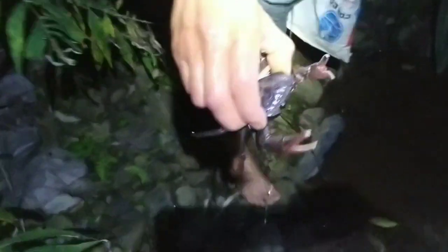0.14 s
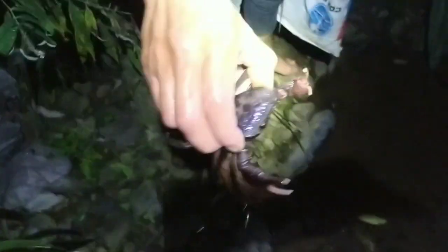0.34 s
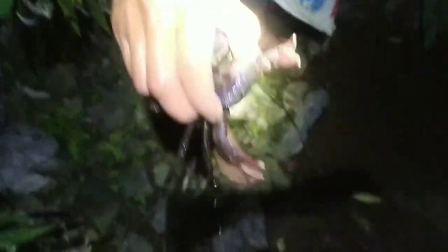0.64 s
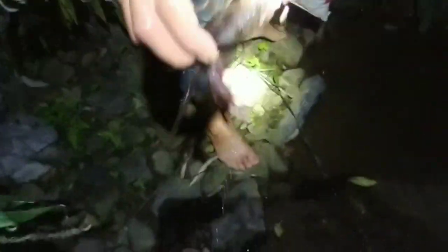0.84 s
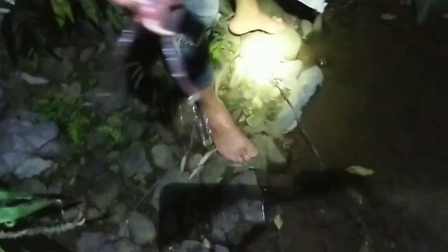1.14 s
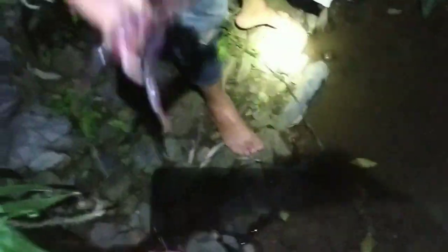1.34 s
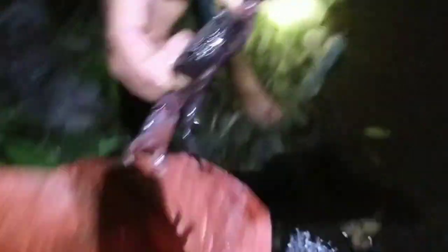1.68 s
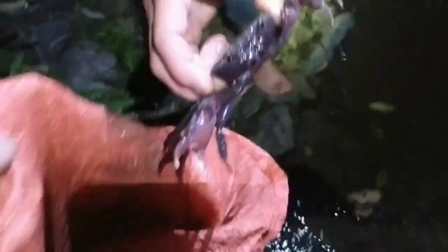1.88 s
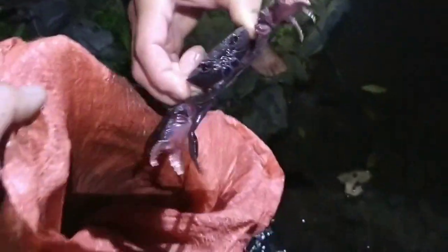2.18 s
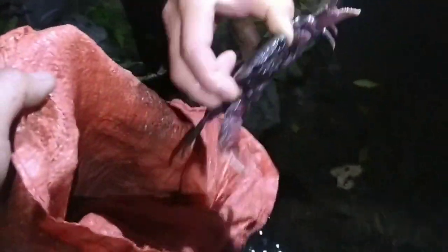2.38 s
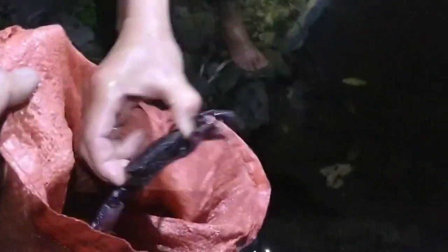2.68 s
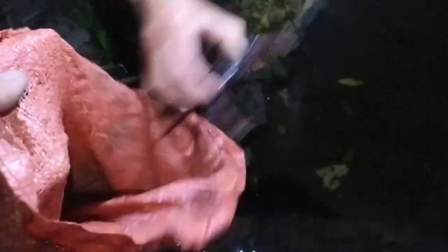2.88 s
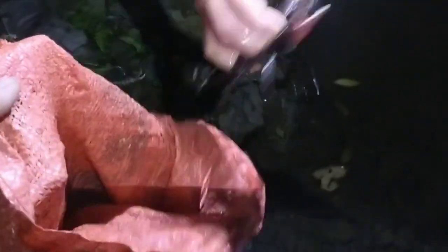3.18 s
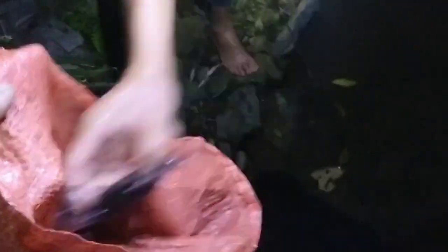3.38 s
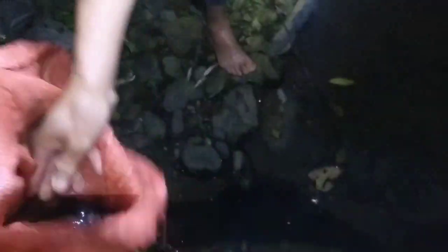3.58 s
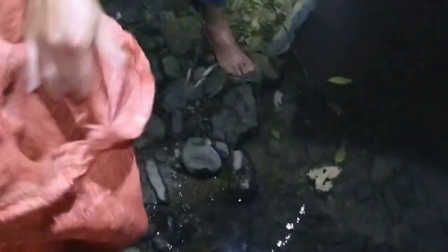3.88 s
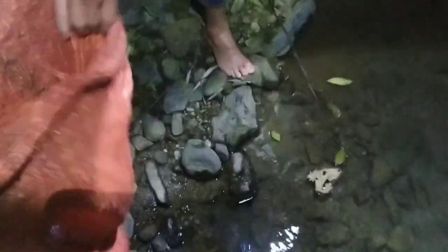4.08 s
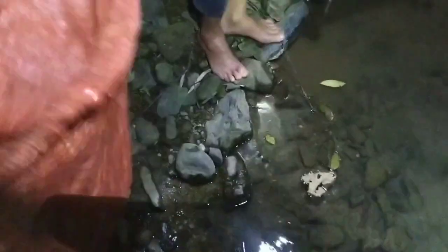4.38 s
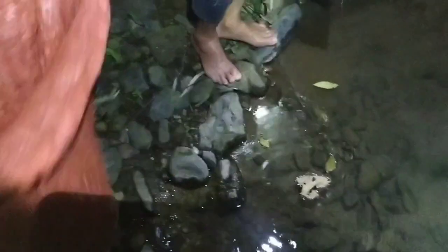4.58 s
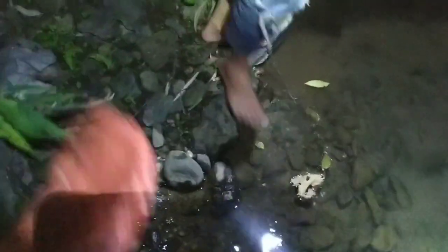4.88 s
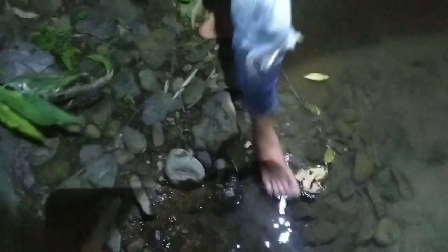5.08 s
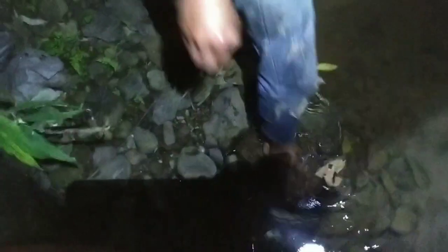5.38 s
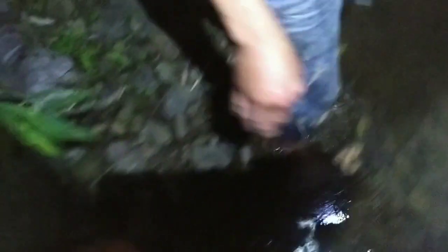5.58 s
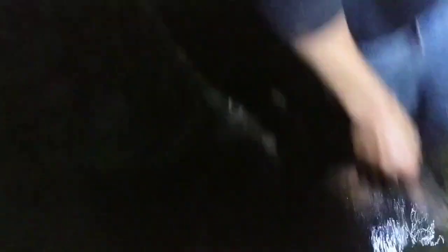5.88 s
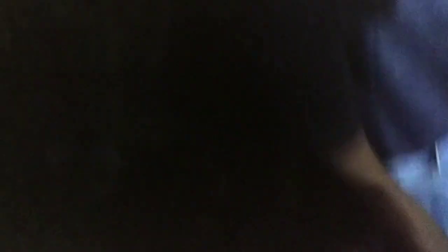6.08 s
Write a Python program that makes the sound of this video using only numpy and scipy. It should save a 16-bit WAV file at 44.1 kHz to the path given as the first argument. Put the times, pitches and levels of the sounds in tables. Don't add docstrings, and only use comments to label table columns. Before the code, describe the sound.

Outdoors beside a shallow stony stream, steady bright fizzing water with tiny bubble blips. A woven sack crackles in short tugs, busiest midway with sharp snaps. Then a finger blocks the left microphone with a heavy low thump, dulling that side briefly. Afterwards a foot plops in and a hand splashes. Close hand-held stereo phone sound, with faint handling rumble.

```python
import sys
import numpy as np
from scipy import signal
from scipy.fft import rfft, irfft, next_fast_len
from scipy.io import wavfile
from scipy.ndimage import uniform_filter1d

SR = 44100
rng = np.random.default_rng(int(sys.argv[2]) if len(sys.argv) > 2 else 0)


def how_loud(loudness_db):
    steps = np.asarray(loudness_db, float) / 20
    return 10 ** steps


def persist_wave(psi):
    counts = np.round(np.clip(psi, -1, 1) * 32767).astype(np.int16)
    wavfile.write(sys.argv[1], SR, np.atleast_2d(counts).T)


N = 275245


def unit(x):
    return x / np.sqrt(np.mean(x ** 2))


def on_log(points, hz):
    point_hz, value = np.transpose(points)
    return np.interp(np.log(hz + 1), np.log(point_hz), value)


def walk(rate):
    held = int(SR / rate)
    steps = np.repeat(rng.standard_normal(N // held + 1), held)
    slewed = uniform_filter1d(uniform_filter1d(steps, held), held)
    return unit(slewed[:N])


def grains(rate, spread_db):
    size_db = spread_db * np.minimum(rng.exponential(size=N), 3)
    bursting = rng.random(N) < rate / SR
    return unit(bursting * rng.standard_normal(N) * how_loud(size_db))


def band(x, lo_hz, hi_hz):
    sos = signal.butter(2, [lo_hz, min(hi_hz, .45 * SR)], "bandpass", fs=SR, output="sos")
    return signal.sosfilt(sos, x)


def moves(rows, rise_s, fade_s, ear=0):
    t, power = np.arange(N) / SR, np.zeros(N)
    for start_s, held_s, level_db, *lean_db in rows:
        before, after = np.minimum(t - start_s, 0), np.maximum(t - start_s - held_s, 0)
        shape = np.exp(before / rise_s - after / fade_s)
        power += (shape * how_loud(level_db + ear * sum(lean_db))) ** 2
    return np.sqrt(power)


def spectrum_axis():
    size = next_fast_len(N)
    return size, np.arange(size // 2 + 1) * SR / size


def ports(x):
    # pitch_hz, level_db (per Hz)
    low_colour = [(8, -16), (20, -3.5), (60, -7), (180, -13), (370, -10.5)]
    # pitch_hz, level_db (per Hz)
    left_colour = [(600, -13), (1300, -8), (2000, -2), (2700, -8), (3300, -13), (4200, -13), (5300, -12),
                   (6250, -0.5), (7050, -8), (8800, -3.0), (9650, 2.36), (11000, -5.5), (12600, -11),
                   (14200, -17.5)]
    # pitch_hz, level_db (per Hz)
    right_colour = [(600, -13.5), (1300, -8.5), (2000, -9.5), (3300, -10.5), (4200, -10.5), (5300, -9.5),
                    (6250, 1.5), (7100, -6.0), (8500, 3.5), (9300, -2), (10200, -9), (11500, -10.5),
                    (13000, -20.5), (14200, -13.5)]
    size, hz = spectrum_axis()
    colour = how_loud([on_log(low_colour + port, hz) for port in (left_colour, right_colour)])
    return irfft(rfft(x, size) * colour, size)[:, :N]


def arrive(near, far_left, far_right):
    # pitch_hz, likeness (0-1)
    port_likeness = [(20, 0.55), (100, 0.79), (350, 0.95), (700, 0.52), (1600, 0.66), (2300, 0.49),
                     (3400, 0), (4300, 0.09), (5500, 0.1), (9000, 0.09)]
    # pitch_hz, left_lead_rad
    left_phase = [(0, 0), (430, -0.5), (1640, -3.0), (2760, -6.6), (3190, -9.2), (3620, -9.5),
                  (4130, -12.8), (4570, -12.8), (5170, -15.6), (6290, -17.4), (9300, -23.1), (11100, -17.7),
                  (12700, -5.2), (14200, 4.4)]
    size, hz = spectrum_axis()
    like = np.clip(on_log(port_likeness, hz), 0, 1)
    late = np.exp(1j * np.interp(hz, *np.transpose(left_phase)))
    common = np.sqrt(like) * rfft(near, size) * np.array([late, np.ones_like(hz)])
    scattered = np.sqrt(1 - like) * rfft([far_left, far_right], size)
    return irfft(common + scattered, size)[:, :N]


def fizz(rate, spread_db, wet):
    dry_share = np.sqrt(1 - wet ** 2)
    near, far_left, far_right = [wet * grains(rate, spread_db) + dry_share * rng.standard_normal(N)
                                 for _ in range(3)]
    return arrive(near, far_left, far_right)


def grip():
    # start_s, held_s, level_db
    shifts = [
        (1.0, .06, -58),
        (1.6, 0.046, -56),
        (2.57, .35, -68),
        (3.42, .36, -57),
        (4.22, 0.073, -63),
        (4.86, 0.035, -63),
    ]
    rumble = unit(band(rng.standard_normal(N), 35, 198))
    return rumble * moves(shifts, rise_s=.03, fade_s=0.024)


def stream():
    # time_s, level_db
    flow_points = [(0.0, -43.5), (0.36, -43), (1.46, -43), (1.84, -42.5), (2.87, -42.5), (3.51, -44),
                   (3.65, -41), (4.85, -42), (5.23, -40), (6.24, -43)]
    surge_db, surges_per_s = 1., 9
    size, hz = spectrum_axis()
    water = rfft(fizz(rate=3000, spread_db=3.7, wet=0.51), size)
    flow_db = np.interp(np.arange(N) / SR, *np.transpose(flow_points))
    flow_db = flow_db - flow_db.mean() + surge_db * walk(surges_per_s)
    octave = np.log2(np.maximum(hz, 20))
    out = 0
    for centre in np.log2(20) + .5 * np.arange(21):
        zone = np.cos(np.pi / 2 * np.clip(2 * (octave - centre), -1, 1)) ** 2
        flicker_db = np.array([1.51 * walk(12) + .5 * walk(3.94) for _ in "lr"])
        swell_db = 0.45 * flow_db * (2 ** centre > 300)
        out = out + irfft(water * zone, size)[:, :N] * how_loud(swell_db + flicker_db)
    return out


def babble(count=150):
    s, pitch, size = rng.random((count, 3)).T
    hz = 350 * 7 ** pitch
    return np.transpose([s * (N / SR - .1), hz, 1.08 * hz, 35 / hz, -56 + 10. * size])


def bubbles():
    # start_s, start_hz, halfway_hz (pitch at half of t60_s), t60_s, peak_db
    plops = [(1.098, 1710, 1800, .02, -46), (2.09, 2040, 2040, 0.044, -34), (5.2003, 2000, 1800, .003, -22),
             (5.2, 716, 720, 0.041, -30.5), (5.285, 377, 383, 0.085, -50), (5.345, 256, 268, 0.12, -40),
             (5.412, 338, 546, 0.054, -38.5), (5.865, 1900, 1950, .045, -47), (5.935, 1090, 1150, .04, -35),
             (6.005, 806, 800, .072, -37), (6.03, 697, 680, 0.067, -40), (6.048, 670, 653, 0.085, -37.5),
             (6.0831, 311, 248, 0.021, -21.5), (6.0915, 270, 252, .032, -29), (6.1, 426, 470, 0.049, -39),
             (6.185, 447, 463, 0.044, -39)]
    left_lag_s, right_lag_s = 0.00023, 0
    rise_share = 0.071
    out = np.zeros((2, N))
    for start_s, hz0, hz1, t60, peak_db in plops + list(babble()):
        i = int(start_s * SR)
        t = np.arange(min(int(t60 * SR), N - i)) / SR
        for ear, lag_s in enumerate((left_lag_s, right_lag_s)):
            u = np.maximum(t - lag_s, 0)
            tone = np.sin(2 * np.pi * (hz0 * u + (hz1 - hz0) * u ** 2 / t60))
            swell = 1 - np.exp(-u / (rise_share * t60))
            out[ear, i:i + t.size] += 2 * how_loud(peak_db - 60 * u / t60) * swell * tone
    return out


def wash():
    # start_s, held_s, level_db
    strokes = [(3.53, 0.099, -46), (3.88, 0.024, -53), (4.05, 0.016, -41.5), (4.25, 0.044, -59),
               (4.95, 0.12, -52), (5.198, 0.013, -41), (5.28, 0.091, -48), (5.6, 0.082, -64),
               (5.73, 0.11, -51), (5.87, 0.017, -43), (5.93, .2, -42.5), (6.2, .04, -43)]
    splash = band(fizz(rate=1500, spread_db=5.0, wet=0.59), 530, 2300)
    return splash * how_loud(46) * moves(strokes, rise_s=0.0055, fade_s=0.024)


def sack():
    # start_s, held_s, level_db, lean_db (added left, taken off right)
    tug_rows = [(.07, .03, -43, 1.5), (.3, 0.043, -34.5, 3), (.43, .02, -36, 2), (.5, .3, -42, 1),
                (1.28, 0.044, -40, 2), (1.55, .45, -51, -6), (2.27, 0.052, -37, 2), (2.5, 0.017, -40, 5),
                (2.61, .04, -45, 0), (2.9, 0.085, -49, 1), (3.09, .02, -34.5, -1), (3.2, .05, -42, -1),
                (3.37, .02, -40, -3), (3.487, .055, -35.5, 6), (3.55, .05, -30.5, 6),
                (3.605, .21, -35, 7.5), (3.83, 0.095, -39, 5.5), (4.04, .04, -39, 1),
                (4.27, 0.066, -32.5, 0.5), (4.82, .06, -36, 1), (5.07, 0.036, -32, -1.5),
                (5.175, 0.011, -29, 4), (5.203, .015, -35, 2), (5.29, 0.037, -34.5, 3),
                (5.45, .07, -35, 0.5), (5.72, 0.026, -36, 1), (5.87, .03, -32.5, -3),
                (5.92, 0.026, -28.5, 3), (5.98, .26, -36.5, 1.5)]
    bursts = how_loud(1.8 * walk(250))
    tugs = np.array([moves(tug_rows, rise_s=.005, fade_s=0.028, ear=ear) for ear in (1, -1)])
    crackle = bursts * fizz(rate=5500, spread_db=1.5, wet=0.75) * how_loud(35) * tugs
    return band(band(crackle, 8640, 17000), 6570, 12700)


def snaps():
    # start_s, peak_db, pitch_hz, left_minus_right_db
    ticks = [(2.2777, -25, 9070, 1.0), (3.0919, -25, 9560, 0.5), (3.47, -17.5, 9670, 8.0),
             (3.4945, -23, 9760, 6.5), (3.5483, -16, 10200, 4.5), (3.5664, -22, 9560, 6.5),
             (3.5733, -16, 8910, 5.0), (3.5784, -22, 9780, 6.5), (3.5844, -19, 9470, 6.5),
             (3.5974, -22, 10000, 5.0), (3.6104, -19, 9770, 10.5), (3.6167, -17, 9750, 14.0),
             (3.6204, -21, 9580, 11.0), (3.6324, -24, 10100, 6.5), (3.6504, -25, 9930, 5.0),
             (3.6784, -24, 9580, 6.0), (3.7494, -24, 9660, 6.0), (3.9275, -22, 9710, 3.0),
             (4.6389, -21, 9990, 1.5), (5.2001, -14, 11500, 5.5), (5.4705, -21, 8400, 0.0),
             (5.5114, -23, 9600, 1.5), (5.8564, -26, 8530, -1.0), (5.883, -21, 9910, -0.5),
             (5.9299, -20, 10100, 6.0), (5.9344, -22, 9700, 5.0), (5.9434, -20, 9100, 2.5),
             (5.9494, -23, 8690, 2.5), (5.9784, -23, 8210, 0.5), (6.0264, -27, 9910, 3.0)]
    out, t = np.zeros((2, N)), np.arange(-60, 140) / SR
    swell = np.exp(-np.abs(t) / np.where(t < 0, .00035, .0007))
    phases = rng.random((len(ticks), 2))
    for (start_s, peak_db, hz, pan_db), phase in zip(ticks, phases):
        i = int(start_s * SR)
        port_hz = [max(hz, 9600), (hz + 8000) / 2]
        ring = np.cos(2 * np.pi * (np.outer(port_hz, t) + phase[:, None]))
        ear_db = np.array([[pan_db], [-pan_db]]) / 2
        out[:, i:i + t.size] += how_loud(peak_db + 2.2 + ear_db) * swell * ring
    return out


def pressure(t, slip_s):
    press_push, leak_s = 3.31, .0295
    suck_push, suck_s = 1.44, .156
    lift_s, settle_s = 4.893, .112
    rebound_push, rebound_s = .091, .32
    on, off = np.maximum(t - slip_s, 0), np.maximum(t - lift_s, 0)
    suck = suck_push * np.exp(-on / suck_s - off / settle_s)
    rebound = rebound_push * (1 - np.exp(-off / settle_s)) * np.exp(-off / rebound_s)
    return press_push * np.exp(-on / leak_s) - suck + rebound


def finger():
    seal_s, seal_push, sag_s = 4.6468, .86, .04
    slip_s, slip_end_s, slip_push = 4.66, 4.66024, .18
    membrane_stop = .845
    t = np.arange(N) / SR
    press = uniform_filter1d(pressure(t, slip_s), 300)
    tremble = unit(band(band(rng.standard_normal(N), 25, 95), 25, 95))
    tremble = tremble * how_loud(-31.5) * np.exp(-((t - 4.78) / 0.12) ** 2)
    seal = (t > seal_s) * seal_push * np.exp(-np.abs(t - seal_s) / sag_s)
    push = np.where(t < slip_s, seal, slip_push)
    push = np.where(t < slip_end_s, push, np.minimum(press + tremble, membrane_stop))
    gap = t - slip_end_s
    scrape_shape = np.exp(np.where(gap < 0, gap / 0.0025, -gap / 0.0014))
    scrape = unit(band(rng.standard_normal(N), 1100, 2050)) * how_loud(-19.5) * scrape_shape
    knock = 0.36 * np.exp(-np.abs(gap) / 0.00079) * (gap > 0)
    return uniform_filter1d(push, 3) + scrape + knock


def left_mute():
    overload_db, start_s, recover_s = -20, 4.662, .025
    covered_db, uncovered_s, uncover_takes_s = -8, 4.86, .07
    t = np.arange(N) / SR
    choke_db = overload_db * np.exp(-np.maximum(t - start_s, 0) / recover_s)
    cover_db = covered_db * np.clip((uncovered_s - t) / uncover_takes_s, 0, 1)
    return how_loud((choke_db + cover_db) * (t > start_s))


def scene():
    water_and_sack = 2 * how_loud(-33.5) * ports(stream() + sack() + wash())
    left, right = water_and_sack + bubbles() + snaps() + grip()
    return np.array([left * left_mute() + finger(), right])


def low_pass(x):
    return signal.sosfilt(signal.butter(12, 14330, fs=SR, output="sos"), x)


def record(dry):
    top_cut = signal.ellip(10, .1, 80, 14300, fs=SR, output="sos")
    mix = np.clip(signal.sosfiltfilt(top_cut, dry), -1, 1)
    return low_pass(mix)


dry = scene()
out = record(dry)
persist_wave(out)
```